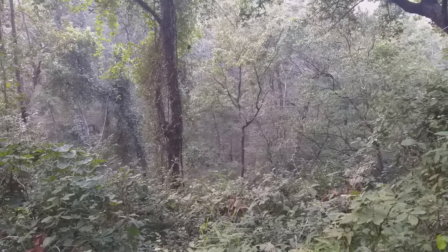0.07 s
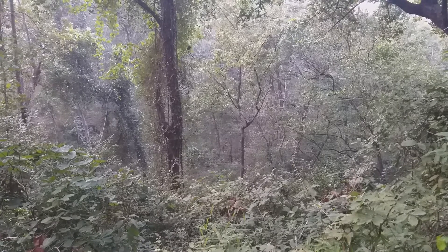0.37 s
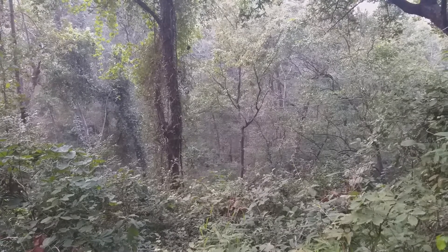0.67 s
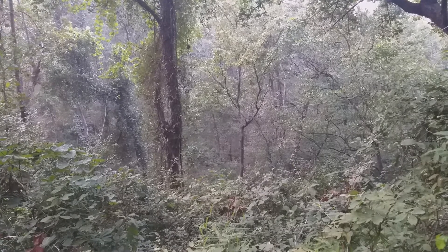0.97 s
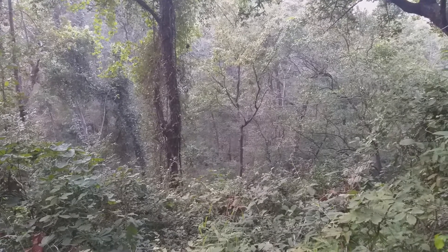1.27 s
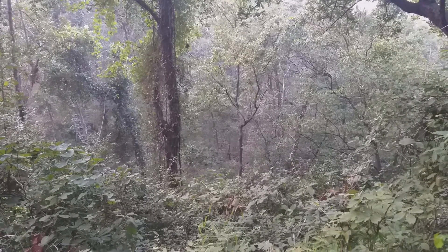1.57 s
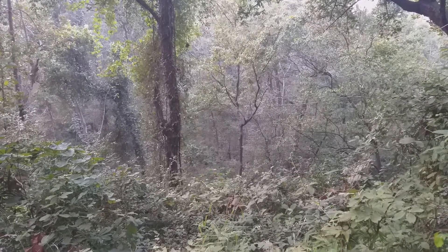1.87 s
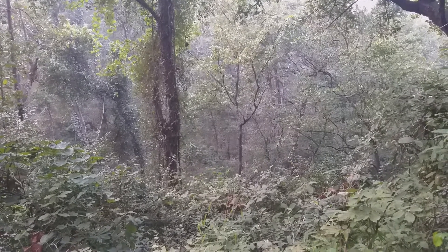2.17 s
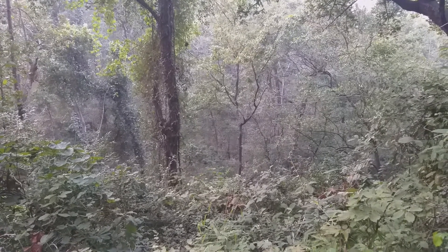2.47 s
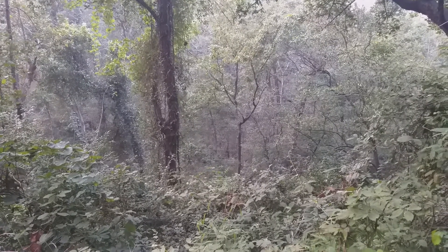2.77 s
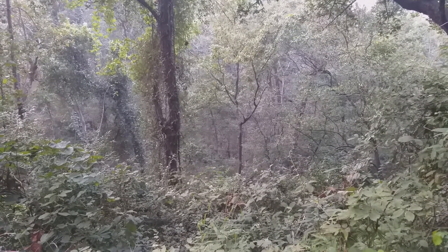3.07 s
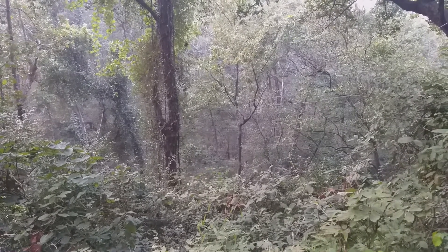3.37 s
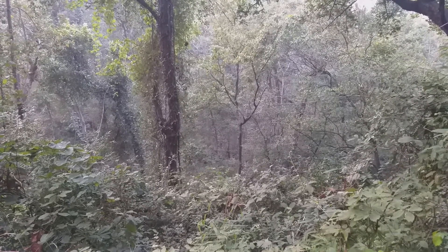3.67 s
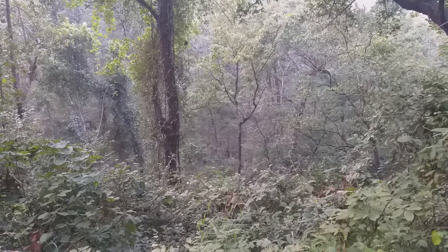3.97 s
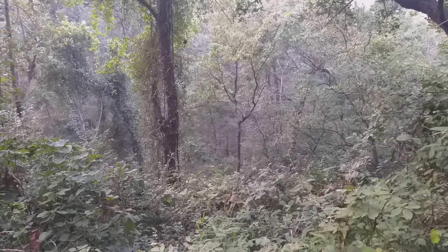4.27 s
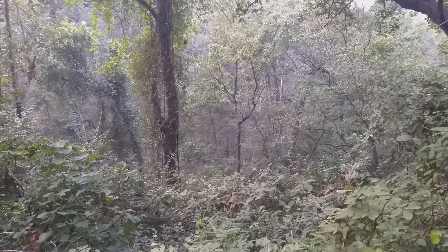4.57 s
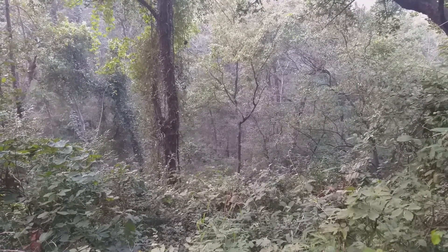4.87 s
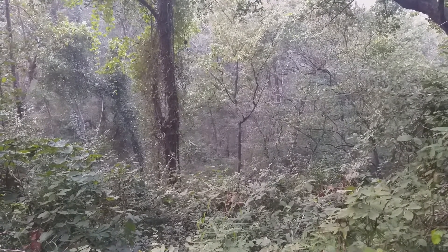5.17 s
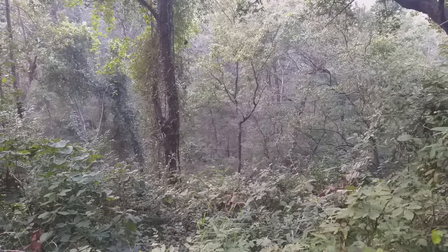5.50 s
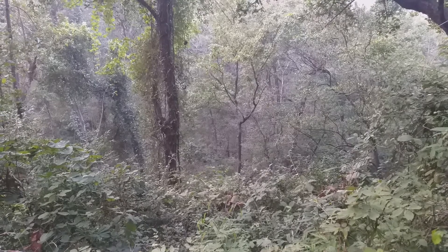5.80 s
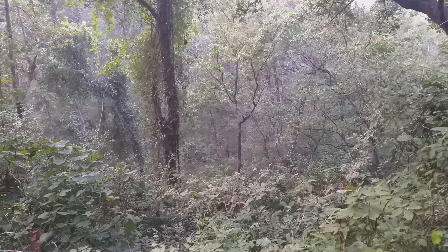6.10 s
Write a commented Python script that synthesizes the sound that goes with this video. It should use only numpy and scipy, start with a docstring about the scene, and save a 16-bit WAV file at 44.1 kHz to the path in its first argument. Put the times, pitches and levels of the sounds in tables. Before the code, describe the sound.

A quiet, dense forest holds a faint airy hiss and a low distant rumble throughout. At about 0.3 seconds a deer barks far off, slightly left of centre: one loud, abrupt, pitched call about a third of a second long that breaks into a hoarse rasp. It scatters among the trunks and returns in dull echoes, fading over a second or so. A small bird gives faint, thin, very high whistles around 0.4 and 1 second. Leaves stir very softly from about 1.3 to 3.5 seconds, and at 1.9 seconds a twig snaps nearby with a brief, crisp splintering crack. The bird gives a few more short whistles between 3.8 and 4.3 seconds. At about 5.3 seconds the deer barks again, just as loud, starting clearer before turning raspy, and its echo dies away into the trees.

```python
"""Two hoarse barks from a deer far off in dense forest: two clashing vocal-fold tones break into a rasp.
Trunks scatter each bark and the slopes send it back. Between the barks a twig snaps nearby,
fibre by fibre, and leaves stir. A small bird gives thin high calls over still air and a low rumble."""
import sys
import numpy as np
from scipy import signal
from scipy.fft import rfft, irfft, next_fast_len
from scipy.io import wavfile
from scipy.ndimage import map_coordinates

SR = 44100
rng = np.random.default_rng(int(sys.argv[2]) if len(sys.argv) > 2 else 0)


def digitize_waveform(pressure):
    """Quantize a signal to 16-bit integers and store it at the path in sys.argv[1].

    Rows of a 2-D input are taken as channels; values are limited to [-1, 1].
    """
    field = np.atleast_2d(pressure).T
    bounded = np.clip(field, -1, 1)
    quanta = np.round(bounded * 32767).astype(np.int16)
    wavfile.write(sys.argv[1], SR, quanta)


N = 279594


def amp(db):
    """dB to gain."""
    return 10 ** (np.asarray(db) / 20)


def unit(x):
    """x at rms 1."""
    return x / np.sqrt(np.mean(x ** 2) + 1e-20)


def along(points, hz):
    """(f/Hz, value) points interpolated on a log axis."""
    f, v = np.transpose(points)
    return np.interp(np.log(hz + 1), np.log(f + 1), v)


def wobble(t, rate_hz):
    """Smooth random curve, rate_hz knots a second."""
    at = (t - t[0]) * rate_hz
    return map_coordinates(rng.standard_normal(int(at[-1]) + 4), [at])


def filtered(x, response):
    """x through a zero-phase gain response(f/Hz)."""
    n = x.shape[-1]
    m = next_fast_len(n + SR // 4)
    return irfft(rfft(x, m) * response(np.fft.rfftfreq(m, 1 / SR)), m)[..., :n]


def lowpass(x, cutoff_hz):
    """24 dB/octave roll-off."""
    return filtered(x, lambda hz: 1 / (1 + (hz / cutoff_hz) ** 4))


def coloured(x, spectrum):
    """x shaped by (f/Hz, level/dB) points, at rms 1."""
    return unit(filtered(x, lambda hz: amp(along(spectrum, hz))))


def resonate(x, modes):
    """x through steep-sided resonances, at rms 1."""
    def power(f):
        return sum(amp(db) ** 2 / (1 + (2 * (f - hz) / width) ** 2) ** 2 for hz, width, db in modes)
    return unit(filtered(x, lambda f: np.sqrt(power(f))))


def add(track, start_s, x):
    """Mix x into track at start_s."""
    i = round(start_s * SR)
    track[..., i:i + x.shape[-1]] += x[..., :N - i]


def stereo_noise(n, correlation):
    """Two white noises with given (f/Hz, L-R correlation) points."""
    def weights(hz):
        angle = np.arccos(np.clip(along(correlation, hz), -1, 1)) / 2
        return np.array([np.cos(angle), np.sin(angle)])
    mid, side = filtered(rng.standard_normal((2, n)), weights)
    return np.array([mid + side, mid - side])


AMBIENT_CORRELATION = [(60, 0.93), (130, 1), (290, 0.97), (640, 0.97), (1410, 0.97), (3100, 0.77),
                       (6820, 0.28), (15000, 0.056)]  # stereo likeness: f/Hz, L-R correlation
RUMBLE_SPECTRUM = [(15, -41), (25, -15.5), (103, 0), (149, -2.5), (227, -10), (300, -12.5), (390, -36),
                   (660, -120)]  # distant rumble: f/Hz, relative density/dB
AIR_SPECTRUM = [(180, -28.5), (300, -2), (526, -1.5), (620, 0), (1140, -2.5), (1540, -1.5), (3180, -10),
                (4000, -9), (6790, -12.5), (7750, -12), (8420, -12.5), (9600, -13), (15500, -11.5)]  # still air: f/Hz, relative density/dB
BREEZE_TREND = [(1.5, -60), (2.64, -60), (5.2, -61)]  # canopy contour before scaling: t/s, level/dB
def air(rumble_db=-62.5, hiss_db=-58, breeze_depth=.52):
    """Distant rumble and faint hiss; the breeze in the far canopy eases slightly."""
    t = np.arange(N) / SR
    rumble_gain = amp(rumble_db + .4 * wobble(t, 5.8))
    rumble = rumble_gain * coloured(stereo_noise(N, AMBIENT_CORRELATION), RUMBLE_SPECTRUM)
    hiss = amp(hiss_db) * coloured(stereo_noise(N, AMBIENT_CORRELATION), AIR_SPECTRUM)
    trend_db = np.interp(t, *np.transpose(BREEZE_TREND))
    canopy_gain = amp(breeze_depth * (trend_db - np.median(trend_db)))
    return rumble + hiss + lowpass(hiss, 2800) * (canopy_gain - 1)


LEAF_SWELLS = [(1.3, .65, -72), (1.9, .85, -70), (2.8, .65, -71)]  # rustles: t/s, length/s, level/dB
LEAF_BAND = [(4600, 3800, 0)]  # rustle band: f/Hz, width/Hz, level/dB
def leaves():
    """Nearby leaves stir in faint, grainy swells."""
    out = np.zeros((2, N))
    for start_s, length_s, db in LEAF_SWELLS:
        t = np.arange(0, length_s, 1 / SR)
        grains = stereo_noise(len(t), AMBIENT_CORRELATION) * amp(3.8 * wobble(t, 150))
        add(out, start_s, amp(db) * np.sin(np.pi * t / length_s) * resonate(grains, LEAF_BAND))
    return out


def undergrowth(x, t60_s, wet_db, build_s=.029):
    """Short diffuse reflection from nearby plants; wet only."""
    t = np.arange(SR) / SR
    tail = stereo_noise(SR, [(2000, .9), (8000, .93)])
    tail *= amp(-60 * t / t60_s) * (1 - np.exp(-t / build_s))
    return amp(wet_db) * signal.fftconvolve(x[None], tail / np.linalg.norm(tail[0]), axes=1)[:, :N]


BIRD_CALLS = [(0.398, 0.076, 7600, 7550, -68), (1.022, .045, 7460, 7400, -65),
              (1.08, .045, 7520, 7360, -70), (3.795, .07, 7560, 7600, -66), (3.917, .1, 8000, 7800, -67),
              (4.173, .11, 7930, 7490, -58.5), (4.215, 0.11, 7970, 8000, -72)]  # whistles: t/s, length/s, start f/Hz, end f/Hz, level/dB
def bird():
    """Thin wavering whistles, smeared by foliage."""
    out = np.zeros(N)
    for start_s, length_s, start_hz, end_hz, db in BIRD_CALLS:
        t = np.arange(0, length_s, 1 / SR)
        hz = np.linspace(start_hz, end_hz, len(t)) * (1 + .02 * wobble(t, 400))
        whistle = np.sin(2 * np.pi * np.cumsum(hz) / SR)
        add(out, start_s, amp(db) * np.sin(np.pi * t / length_s) * whistle)
    return out + undergrowth(out, t60_s=.73, wet_db=-2)


TEAR_SPAN = (1.876, 0.042, -42.5)  # one crackle: t/s, length/s, level/dB
SPLINTER_BAND = [(4800, 1600, 0)]  # crackle band: f/Hz, width/Hz, level/dB
def tearing():
    """Fine crackle of splinters as the twig bends through."""
    out = np.zeros(N)
    start_s, length_s, db = TEAR_SPAN
    t = np.arange(0, length_s, 1 / SR)
    grains = rng.standard_normal(len(t)) * amp(4 * wobble(t, 900))
    add(out, start_s, amp(db) * np.sin(np.pi * t / length_s) * resonate(grains, SPLINTER_BAND))
    return out


TWIG_CRACKS = [(1.8668, -41, 2), (1.8848, -36, 3), (1.8925, -30, 2), (1.9051, -16, 4)]  # cracks: t/s, first impulse level/dB, fibre count
WOOD_SPECTRUM = [(1000, -35), (2300, -8), (3600, -8), (4450, 1), (5200, -2), (6300, -12), (7600, -12),
                 (8800, -28), (15000, -34)]  # wood colour: f/Hz, relative level/dB
def twig(fibre_gap_s=.0015, weaken_db=1, splinters=14, splinter_db=-41, spread_s=.0014):
    """Each crack is a quick run of breaking fibres; stronger fibres shed larger splinters."""
    clicks = np.zeros(N)
    median_db = np.median([db for _, db, _ in TWIG_CRACKS])
    for start_s, db, fibres in TWIG_CRACKS:
        for k in range(fibres):
            fibre_s = start_s + fibre_gap_s * (k + rng.uniform(-.18, .25))
            clicks[round(fibre_s * SR)] += amp(db - weaken_db * k)
            lag, size = rng.standard_normal((2, splinters))
            at = np.round((fibre_s + spread_s * abs(lag)) * SR).astype(int)
            clicks[at] += size * amp(splinter_db + (db - median_db) / 2)
    wood = lambda hz: amp(along(WOOD_SPECTRUM, hz))
    snap = filtered(clicks, lambda hz: wood(hz) / np.mean(wood(hz))) + tearing()
    return snap + lowpass(undergrowth(snap, t60_s=.24, wet_db=-12), 4500)


TRUNK_CORRELATION = [(700, .999), (1150, .91), (1900, .98), (4000, .975)]  # scatter likeness: f/Hz, L-R correlation
TRUNK_SPECTRUM = [(630, -8), (1100, -5), (1900, 5.5), (2500, 3), (3200, 2), (4500, 2.5)]  # scatter colour: f/Hz, level/dB
FOLIAGE_LOSS = [(630, -5.5), (1150, 6), (1900, -3), (2500, 5.5), (3200, 30.5), (4500, 30)]  # added decay: f/Hz, loss/(dB/s)
def trunk_scatter(t, early_t60_s=1, late_t60_s=4.5, far_s=.49, far_spread_s=.053, build_s=.069):
    """Impulse response of the trunks: dense early cluster, far cluster, long uneven tail."""
    envelope = amp(8 - 60 * t / early_t60_s) + amp(-30 - 60 * t / late_t60_s)
    envelope += amp(-19.5) * np.exp(-((t - far_s) / far_spread_s) ** 2)
    envelope *= (1 - np.exp(-t / build_s)) * amp(2.5 * wobble(t, 25))
    scatter = stereo_noise(len(t), TRUNK_CORRELATION) * envelope / np.linalg.norm(envelope)
    hz, delay_s, frames = signal.stft(scatter, SR, nperseg=256)
    colour = amp(along(TRUNK_SPECTRUM, hz)[:, None] - along(FOLIAGE_LOSS, hz)[:, None] * delay_s)
    return signal.istft(frames * colour, SR, nperseg=256)[1][:, :len(t)]


SLOPE_ECHOES = [(.245, -10.5), (.335, -13), (.475, -22.5), (.585, -30.5), (.83, -38.5)]  # reflections: delay/s, level/dB
def forest(x, echo_cutoff_hz=1100):
    """Direct sound, trunk scatter and dull echoes from the slopes."""
    t = np.arange(3 * SR // 2) / SR
    echoes = np.zeros(len(t))
    for delay_s, db in SLOPE_ECHOES:
        echoes[round(delay_s * SR)] = amp(db)
    paths = trunk_scatter(t) + lowpass(echoes, echo_cutoff_hz)
    paths[:, 0] += 1  # direct path
    return signal.fftconvolve(x[None], paths, axes=1)


def jittered_phase(t, hz, jitter, rate_hz):
    """Phase/rad of a vibration with random relative pitch jitter."""
    return 2 * np.pi * np.cumsum(hz * (1 + jitter * wobble(t, rate_hz))) / SR


def harmonics(partials, phase):
    """(multiple, level/dB) partials on one phase, at rms 1."""
    return unit(sum(amp(db) * np.sin(k * phase) for k, db in partials))


def bursts(peaks, t, rise_db_per_s, fall_db_per_s):
    """Gain peaking at each (t/s, level/dB) row."""
    return sum(amp(db + np.minimum(rise_db_per_s * (t - s), fall_db_per_s * (s - t))) for s, db in peaks)


def mouth(voice, opening_s, closed_hz=1950):
    """The opening mouth lets out treble: the cutoff grows by a factor e per opening_s."""
    hz, frame_s, frames = signal.stft(voice, SR, nperseg=256)
    cutoff_hz = closed_hz * np.exp(frame_s / opening_s)
    frames = frames / (1 + (hz[:, None] / cutoff_hz) ** 12)
    return signal.istft(frames, SR, nperseg=256)[1][:len(voice)]


CROAK_SLIPS = [(.388, -29.5), (.495, -31), (5.403, -32), (5.455, -33)]  # fold slips: scene t/s, level/dB
CROAK_MODES = [(688, 128, -2.5), (835, 42, -4.5), (1112, 91, -2)]  # low resonances: f/Hz, width/Hz, level/dB
def croak(scene_t, airflow, rough, swell, steady_db=-36.5):
    """Chaotic folds ring low resonances, louder at each slip."""
    slips = bursts(CROAK_SLIPS, scene_t, rise_db_per_s=698.5, fall_db_per_s=450.5)
    return (swell * amp(steady_db) * np.sqrt(rough) + slips) * resonate(airflow, CROAK_MODES)


YELP_FLARES = [(.341, -30), (.397, -24), (5.292, -28)]  # second fold's flares: scene t/s, level/dB
YELP_PARTIALS = [(1, -16), (2, 0.5), (3, -6), (4, -9), (5, -8.5)]  # its harmonics: multiple, level/dB
def yelp(scene_t, phase, rough, swell, steady_db=-42.5):
    """The second, lower fold: a shaky tone with brief flares."""
    tone = unit(harmonics(YELP_PARTIALS, phase) * amp(4.3 * rough * wobble(scene_t, 120)))
    flares = bursts(YELP_FLARES, scene_t, rise_db_per_s=853, fall_db_per_s=449)
    return (swell * amp(steady_db) + flares) * tone


FOLD_PARTIALS = [(2, -13.5), (3, -3), (4, -1), (5, -9.5), (6, -34), (7, -17.5)]  # main fold's overtones: multiple, level/dB
def main_fold(t, phase, flutter, rough):
    """Clear fundamental and buzzing overtones; flutter puts sidebands on both."""
    tone = np.sqrt(2) * np.sin(phase) * (1 + amp(-22) * flutter)
    tone *= amp(2.5 * rough * wobble(t, 30))
    shaken_phase = phase + .36 * rough * wobble(t, 200)
    buzz = unit(harmonics(FOLD_PARTIALS, shaken_phase) * (1 + .32 * flutter))
    return tone, buzz


THROAT_MODES = [(1033, 300, 3), (1240, 650, -25.5), (1820, 1300, -7.5), (1854, 116, 3), (2135, 270, -7.5),
                (2300, 220, -25), (2475, 82, 11), (2930, 120, -8), (2830, 150, -18)]  # throat resonances: f/Hz, width/Hz, level/dB
MOUTH_HISS = [(2600, -34), (3200, 8), (3600, -1), (4050, 2.5), (4450, 5.5), (4800, -4), (5100, -4),
              (5600, -19.5), (7500, -28.5)]  # breath: f/Hz, relative density/dB
def bark(start_s, length_s, top_hz, tone_db, opening_s, broken_s, rough_before, rough_after,
         swing_hz=46.97, flutter_hz=183, yelp_hz=578, rasp_db=-32.5, hiss_db=-45,
         attack_s=.031, main_lag_s=.018, break_s=.046, release_s=.01):
    """Two folds at clashing pitches, shaken by a slower flutter, break into a rasp."""
    t = np.arange(0, length_s + release_s, 1 / SR)
    # effort crests, then gives out; pitch and clear tone follow
    crest_s = .6 * length_s
    climb = 1 - .894 * (1 - t / crest_s) ** 2
    fall = 1 - ((t - crest_s) / (length_s - crest_s)) ** 2
    effort = np.where(t < crest_s, climb, fall)
    pitch_hz = top_hz - swing_hz * (1 - effort)
    rough = np.interp(t, [broken_s - break_s, broken_s], [rough_before, rough_after])
    swell = amp(-23 * np.maximum(1 - t / attack_s, 0))
    main_swell = amp(-23 * np.maximum(1 - (t - main_lag_s) / attack_s, 0))

    phase = jittered_phase(t, pitch_hz, .011 * rough, 100)
    flutter = np.cos(jittered_phase(t, flutter_hz * pitch_hz / np.mean(pitch_hz), .05 * rough, 90))
    yelp_phase = jittered_phase(t, yelp_hz * (1 - .096 * t), .045 * rough, 120)
    tone, buzz = main_fold(t, phase, flutter, rough)
    tone *= amp(tone_db - 9.5 * (1 - effort))
    voice = yelp(start_s + t, yelp_phase, rough, swell)

    def puffs():
        """Turbulent air escaping once a cycle."""
        return rng.standard_normal(len(t)) * (1 + .36 * np.cos(phase)) * (1 + .5 * flutter)
    rasp = np.sqrt(1 - rough) * buzz + np.sqrt(rough) * resonate(puffs(), THROAT_MODES)
    voice += main_swell * (tone + amp(rasp_db + 1.5 * t / length_s) * rasp)
    voice += croak(start_s + t, puffs(), rough, swell)

    closure = np.maximum(1 - t / (.74 * length_s), 0) * opening_s / length_s
    hiss = swell * amp(hiss_db - 24.5 * closure) * coloured(puffs(), MOUTH_HISS)
    gate = np.clip(np.minimum(t, t[-1] - t) / release_s, 0, 1)
    voice = gate * (mouth(voice, opening_s) + hiss)
    return filtered(voice, lambda hz: 1 - 1 / (1 + (hz / 400) ** 8))  # a small muzzle radiates no bass


# barks: t/s, length/s, top f/Hz, level/dB, clear tone level/dB, mouth time constant/s,
# end of break after onset/s, roughness before/0-1, roughness after/0-1
DEER_BARKS = [ (.301, .314, 646.2, -1.37, -22, 0.29, 0.081, 0.39, 0.47),
              (5.258, .282, 641, 0.07, -20.5, .14, 0.143, 0.1, .41), ]
DEER_BALANCE = [(750, 0), (1150, 3.3), (1900, .5), (2450, 1.2), (3500, 0)]  # stereo balance: f/Hz, left minus right/dB
def deer():
    """Both barks through the forest, slightly left of centre."""
    out = np.zeros((2, N))
    for start_s, length_s, top_hz, db, *voicing in DEER_BARKS:
        add(out, start_s, amp(db) * forest(bark(start_s, length_s, top_hz, *voicing)))
    return filtered(out, lambda hz: amp(np.outer([.5, -.5], along(DEER_BALANCE, hz))))


def scene():
    """Everything heard from the forest edge."""
    return deer() + twig() + bird() + leaves() + air()


def record(dry, limit_hz=15700):
    """Brick-wall band limit."""
    return filtered(dry, lambda hz: hz < limit_hz)


dry = scene()
out = record(dry)
digitize_waveform(out)
```